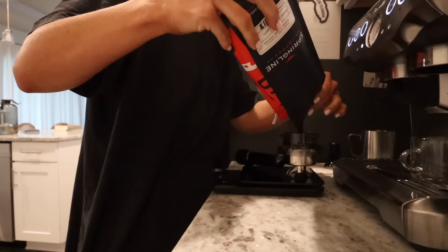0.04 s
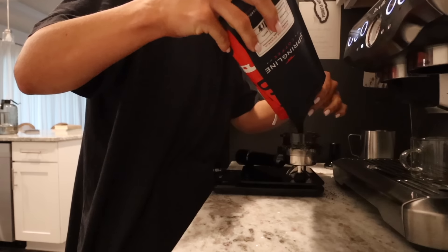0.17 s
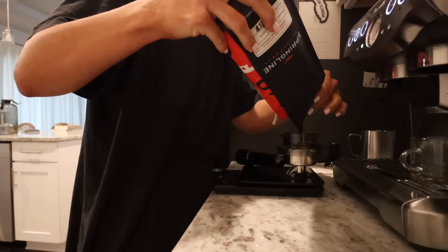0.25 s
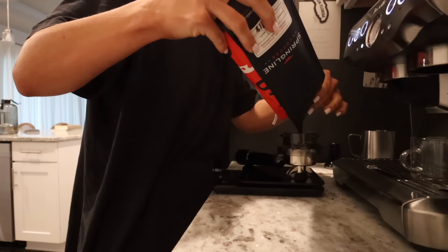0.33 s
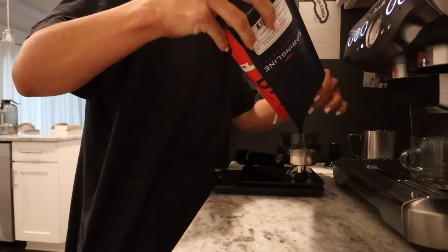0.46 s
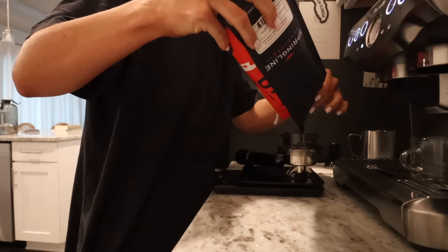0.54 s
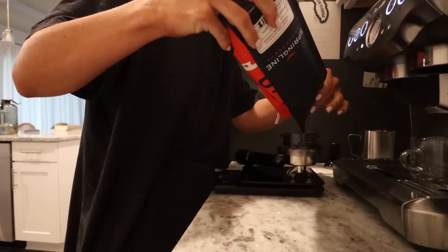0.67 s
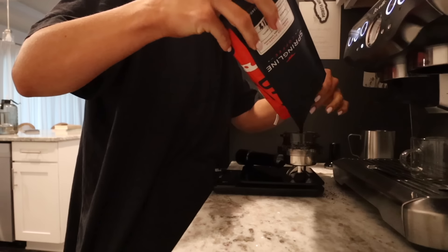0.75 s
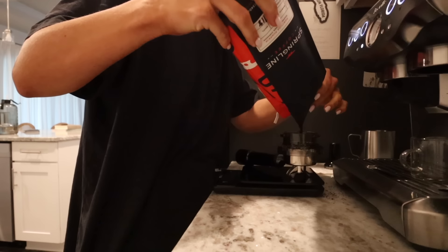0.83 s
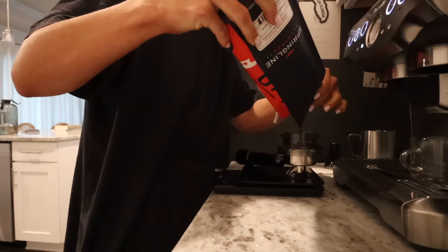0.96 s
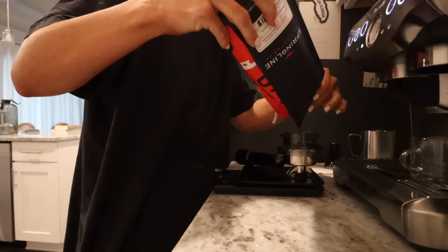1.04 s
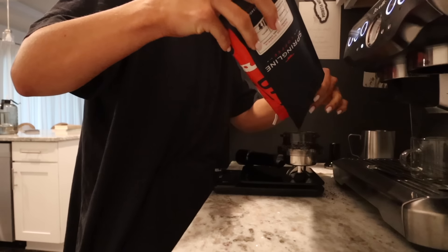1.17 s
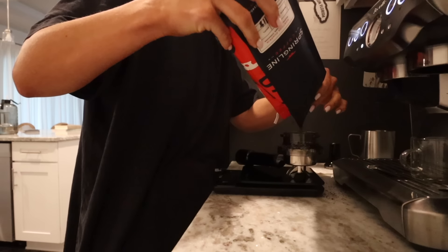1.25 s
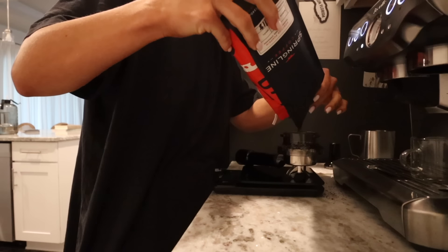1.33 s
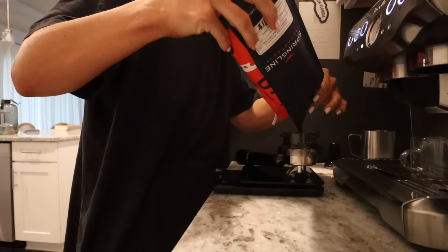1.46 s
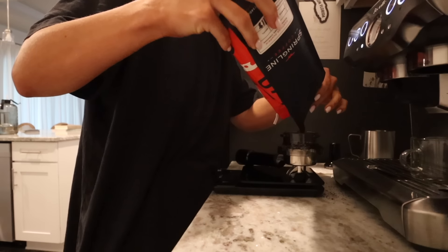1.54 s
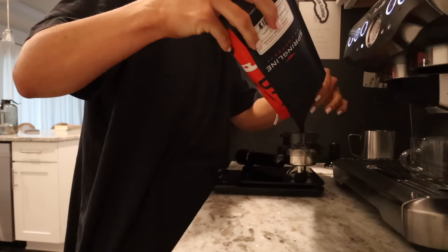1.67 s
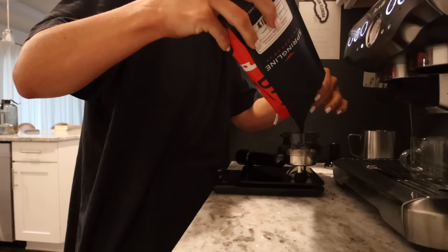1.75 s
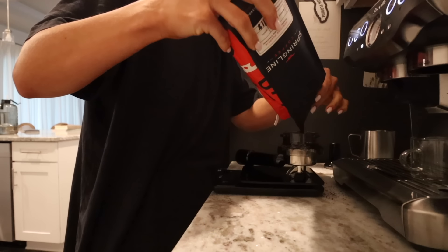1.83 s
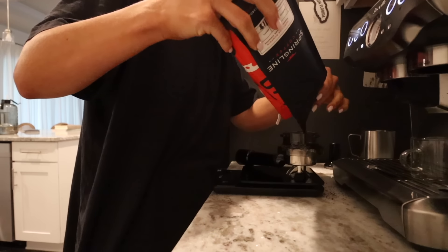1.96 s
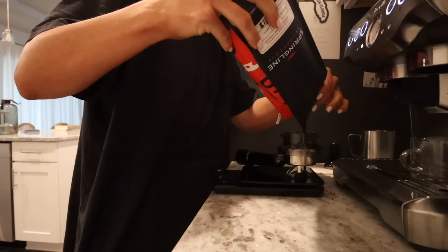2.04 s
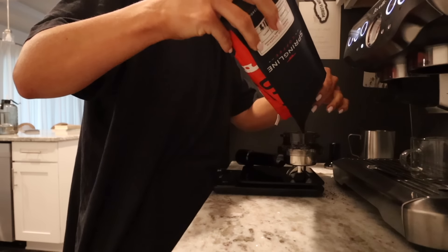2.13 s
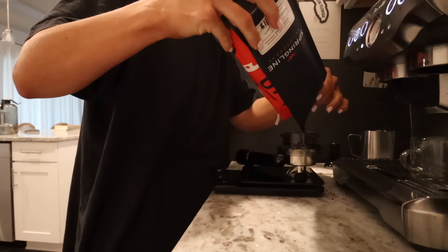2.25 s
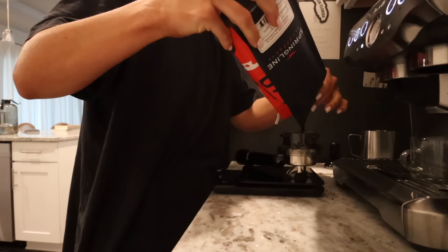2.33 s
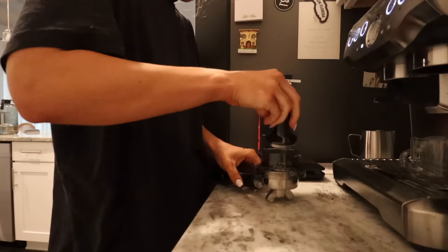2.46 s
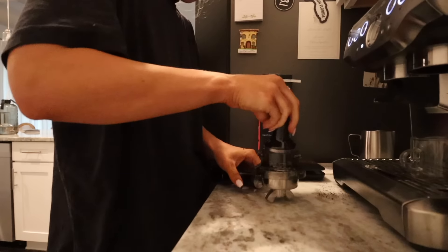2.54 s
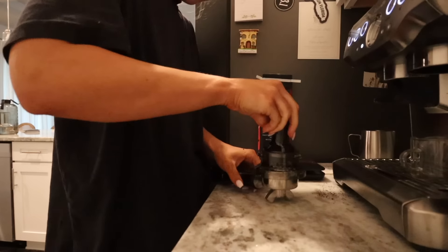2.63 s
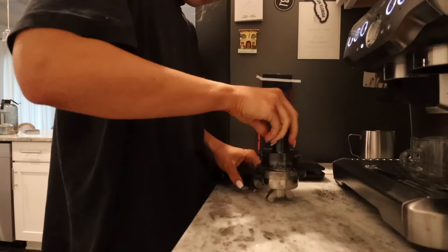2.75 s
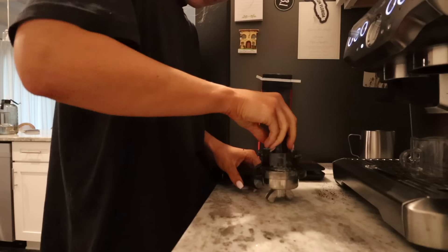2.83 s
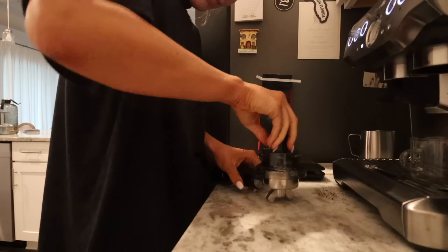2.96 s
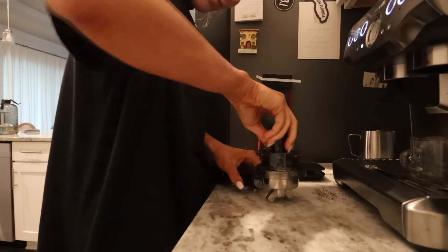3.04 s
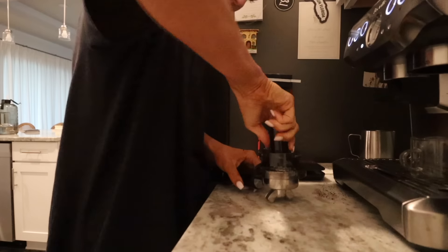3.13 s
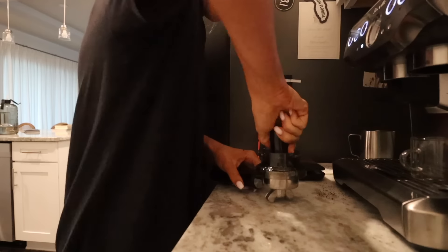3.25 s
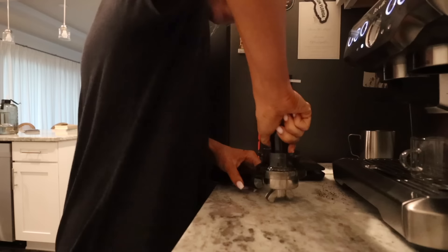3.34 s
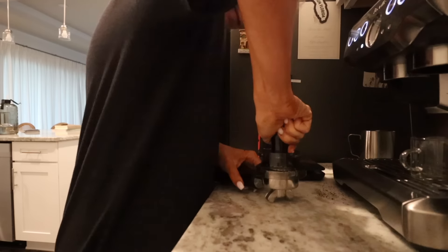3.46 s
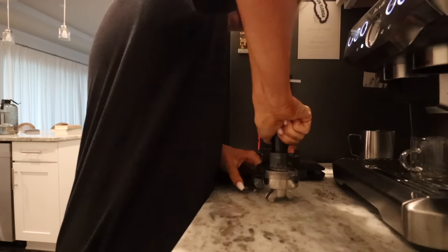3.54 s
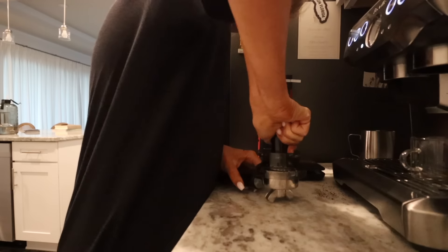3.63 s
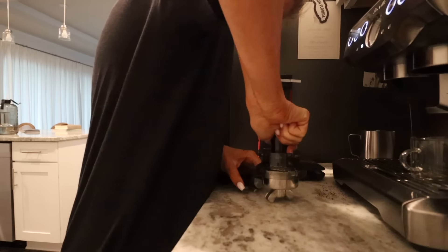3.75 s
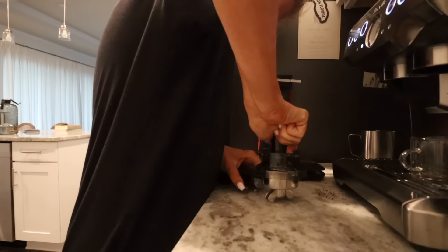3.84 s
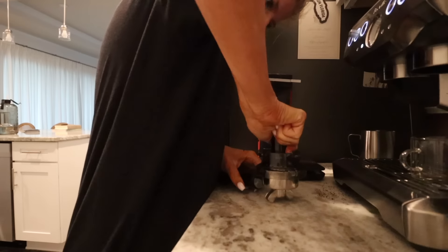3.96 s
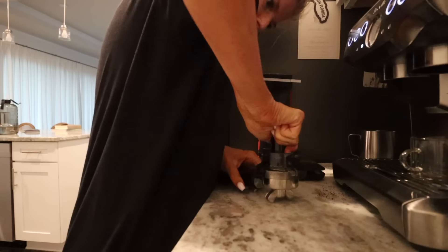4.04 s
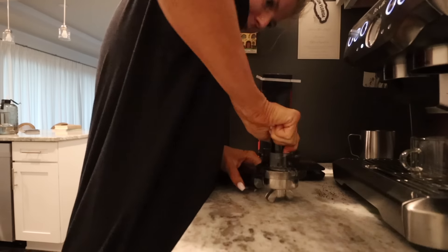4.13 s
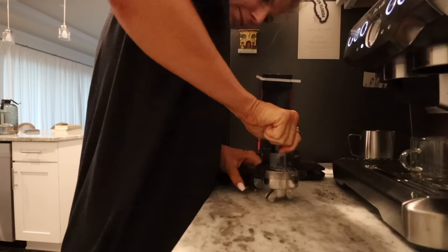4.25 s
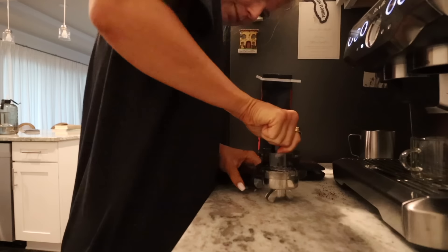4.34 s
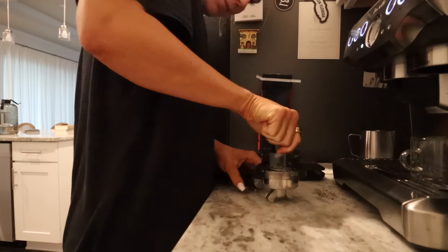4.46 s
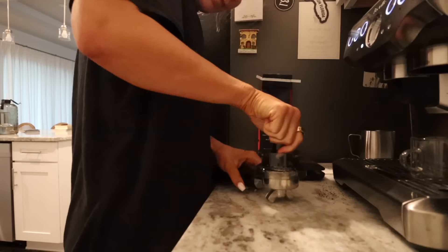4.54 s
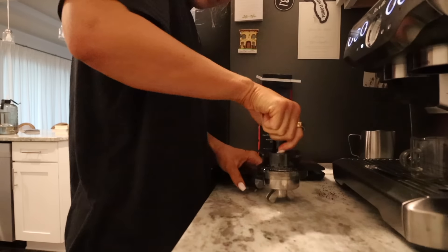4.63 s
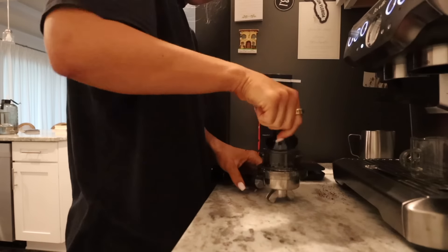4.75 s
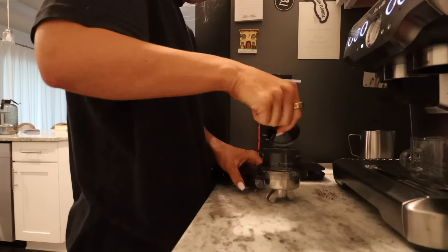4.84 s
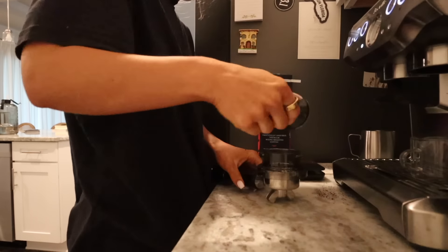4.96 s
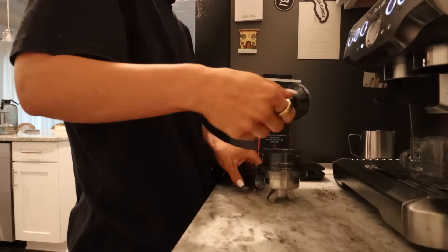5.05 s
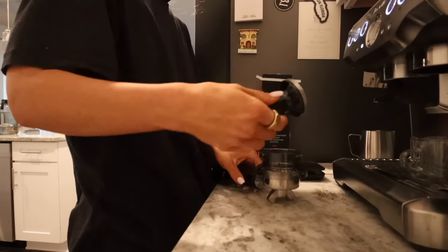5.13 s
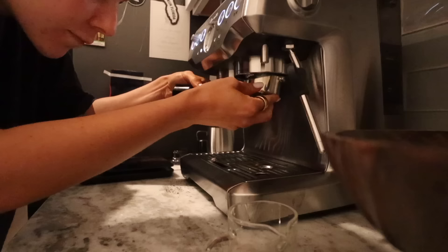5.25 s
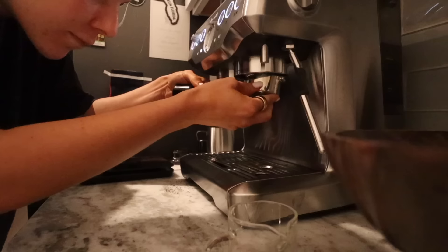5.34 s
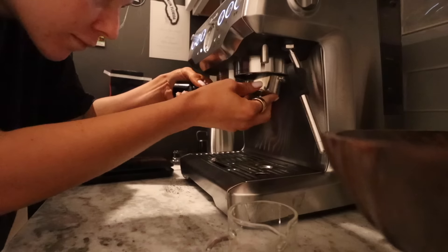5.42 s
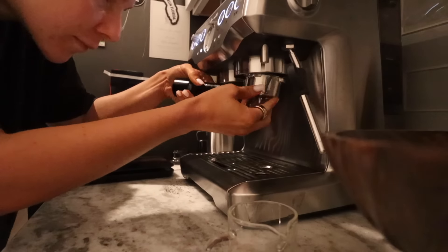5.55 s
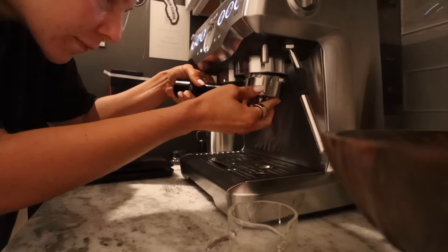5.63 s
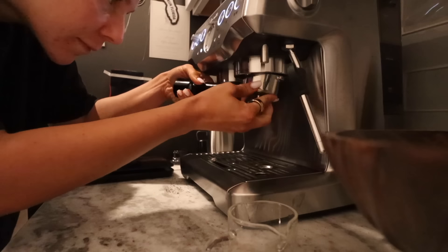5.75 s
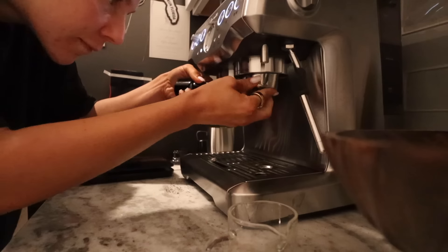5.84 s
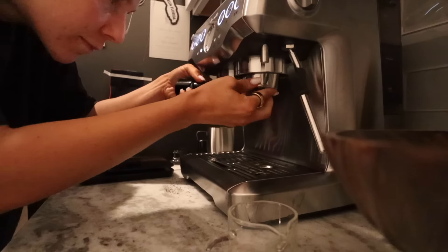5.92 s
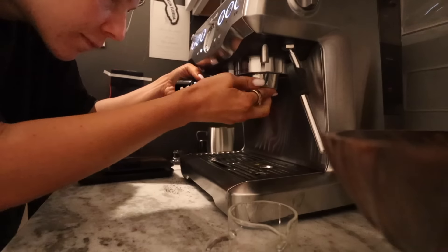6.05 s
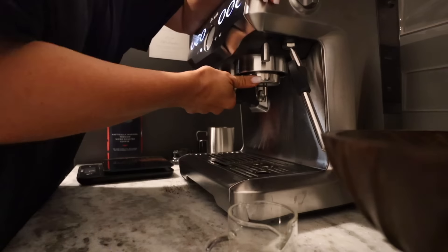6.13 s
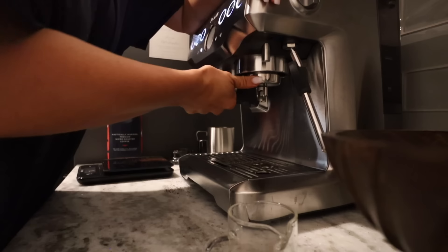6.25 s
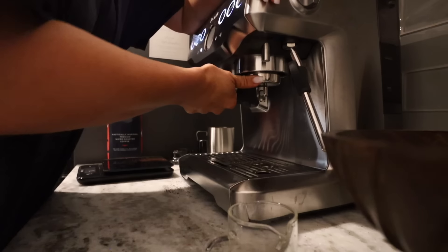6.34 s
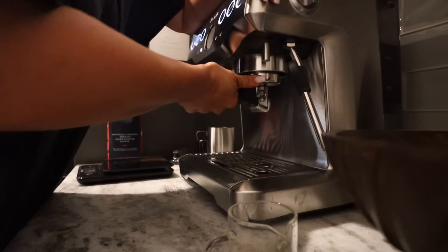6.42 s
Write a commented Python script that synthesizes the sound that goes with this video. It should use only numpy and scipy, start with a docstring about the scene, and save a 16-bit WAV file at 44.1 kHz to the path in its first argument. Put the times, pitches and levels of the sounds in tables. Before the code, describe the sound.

Faint, mostly low room air lies under everything in a small hard-surfaced kitchen, heard in near stereo. From 0 to 2.5 seconds dry coffee grounds hiss and patter into a metal basket, in quick shaken surges strongest around 1.2-1.7 and again near 2.2; from 1.15 the bag gives soft hollow booms and crinkles, with one sharper buckle at 1.5. At 2.6 the basket knocks loudly on stone with a dead thud, followed by smaller knocks and steel clinks until 3.15. Quiet gritty rubbing continues, with a quickening judder at 3.8-4.15, a tiny squeak at 3.98 and twisting scrapes to 4.7, when the tamper pops free hollowly. A faint brushing fades by 5.2. From 5.62 bright, heavy metal clanks hit the machine, densest and loudest around 5.85, with dry ticks and scraping. After a lull, a stuttering low groan swells at 6.45 and stops.

```python
"""Coffee grounds trickle and surge out of a bag over the quiet air of a small kitchen: coloured grains and hiss.
The bag flexes in short hollow booms. On the stone counter a tamper is set into the portafilter basket,
pressed down in slips and twisted: struck modes for the blows, resonant grit for the rubbing.
Then the portafilter clanks into the machine's group head and is wrenched tight with a stuttering groan.
Tamping has the least room sound, so it seems closest; a pair of microphones hears it all in stereo."""
import sys
import numpy as np
from scipy import signal
from scipy.fft import rfft, irfft, next_fast_len
from scipy.io import wavfile
from scipy.ndimage import uniform_filter1d

SR = 44100
rng = np.random.default_rng(int(sys.argv[2]) if len(sys.argv) > 2 else 0)


def int16_out(signal):
    """Quantize to a 16-bit WAV file."""
    q = np.round(np.clip(np.atleast_2d(signal).T, -1, 1) * 32767)
    wavfile.write(sys.argv[1], SR, q.astype(np.int16))


N = 286209
TIME = np.arange(N) / SR


def gain_of(db):
    """Decibels to amplitude."""
    return 10 ** (np.asarray(db) / 20)


def evened(x):
    """Scales to rms 1."""
    return x / np.sqrt(np.mean(x ** 2) + 1e-20)


def read(points, hz):
    """A spectrum joined by straight lines over log frequency."""
    f, value = np.transpose(points)
    return np.interp(np.log(hz + 1), np.log(f + 1), value)


def follow(rows):
    """Every column of a curve at each sample."""
    s, *columns = np.transpose(rows)
    return [np.interp(TIME, s, c) for c in columns]


def coloured(x, points):
    """Filters by a dB spectrum."""
    size = next_fast_len(x.shape[-1])
    gain = gain_of(read(points, np.fft.rfftfreq(size, 1 / SR)))
    return irfft(rfft(x, size) * gain, size)[..., :x.shape[-1]]


def dying(x, t60s):
    """Lets each frequency die at its own speed."""
    hz, t, z = signal.stft(x, SR, nperseg=128)
    decay = gain_of(-60 * t / read(t60s, hz)[:, None])
    return signal.istft(z * decay, SR)[1][:, :x.shape[-1]]


def resonated(x, hz, width):
    """Passes x through one resonance, its width in Hz."""
    return signal.lfilter(*signal.iirpeak(hz, hz / width, SR), x)


def band_passed(x, order, low_hz, high_hz):
    """Keeps one frequency band."""
    return signal.sosfilt(signal.butter(order, [low_hz, high_hz], "band", fs=SR, output="sos"), x)


def add(mix, s, sound):
    """Mixes a sound in at time s."""
    part = mix[:, max(round(s * SR), 0):][:, :sound.shape[-1]]
    part += sound[..., :part.shape[-1]]


def grains(per_s, spread_db, hiss):
    """Many tiny impacts of unequal size over a smooth hiss."""
    sizes = gain_of(spread_db * np.minimum(rng.exponential(1, (2, N)), 4))
    signed = sizes * rng.choice([-1, 1], (2, N))
    impacts = evened(signed * (rng.random((2, N)) < per_s / SR))
    return evened(impacts + hiss * rng.standard_normal((2, N)))


def clumped(x, depth_db, size):
    """Makes the level flutter at random, smoothed over size samples."""
    return x * gain_of(depth_db * evened(uniform_filter1d(rng.standard_normal(N), size)))


# the still kitchen: (frequency [Hz], relative level [dB])
AIR_SPECTRUM = [(12, -66), (20, -3.5), (88, -1.5), (110, -6.5), (163, -10), (210, -12), (310, -9.5),
                (459, -12.5), (642, -17.5), (1860, -24.5), (2080, -24.5), (3440, -29.5), (4940, -33.5),
                (8410, -44.5), (10500, -52.5), (12500, -70), (16000, -79)]
AIR_DB = -56


def kitchen_air():
    """Steady noise, mostly low, in the colour of the still kitchen."""
    return gain_of(AIR_DB) * evened(coloured(rng.standard_normal((2, N)), AIR_SPECTRUM))


# steady trickle of coffee out of the bag: (time [s], level [dB])
TRICKLE_LEVEL = [(0.0, -59.5), (0.3, -61.5), (0.7, -66.5), (1.03, -73), (1.3, -69), (1.74, -61), (2.0, -70),
                 (2.44, -67), (2.53, -86)]
# each shake of the bag lets a surge of grounds slide out: (time at its height [s], level [dB])
SHAKE_SURGES = [(0.02, -61.5), (0.14, -56), (0.42, -62), (0.55, -61), (0.81, -61), (0.96, -65), (1.11, -62),
                (1.243, -51.5), (1.387, -50), (1.52, -50.5), (1.665, -53.5), (1.795, -69), (1.925, -60),
                (2.065, -56), (2.208, -53), (2.345, -55.5)]
# the patter of the flowing grounds: (frequency [Hz], relative level [dB])
PATTER_SPECTRUM = [(300, -54), (900, 0.5), (1350, 5), (2200, -0.5), (2750, 5), (3300, 9.5), (4000, 6),
                   (4600, 2.5), (5400, 1.5), (6500, -1), (9500, -0.5), (11500, -17), (13000, -36),
                   (15000, -33)]
# single coarse crumbs: (frequency [Hz], relative level [dB])
CRUMB_SPECTRUM = [(600, -19), (2600, -2), (4000, -2), (6000, -7), (10000, -13), (12500, -42), (16000, -65)]
SURGE_RISE_S, SURGE_FALL_S = 0.023, 0.027
# the bare basket rings under the first grounds and is muffled as it fills
BARE_HZ, BARE_WIDTH_HZ, BARE_DB, MUFFLE_DB_PER_S = 4440, 900, -3, 21


def pour():
    """Grounds slide over the foil and patter into the basket in small clumps, in a trickle and surges."""
    trickle_db, = follow(TRICKLE_LEVEL)
    power = gain_of(trickle_db) ** 2 * (TIME < TRICKLE_LEVEL[-1][0])
    for s, db in SHAKE_SURGES:
        width = np.where(TIME < s, SURGE_RISE_S, SURGE_FALL_S)
        power = power + gain_of(db) ** 2 / (1 + ((TIME - s) / width) ** 2 / 2) ** 3
    flow = clumped(grains(per_s=2600, spread_db=0.0, hiss=0.57), depth_db=1.17, size=220)
    crumbs = coloured(grains(per_s=140, spread_db=2.2, hiss=0), CRUMB_SPECTRUM)
    patter = evened(coloured(flow, PATTER_SPECTRUM)) + gain_of(-12.0) * evened(crumbs)
    ring = resonated(patter, BARE_HZ, BARE_WIDTH_HZ)
    return np.sqrt(power) * (patter + gain_of(BARE_DB - MUFFLE_DB_PER_S * TIME) * ring)


def hollow(rows, glide, crackle_decay, crackle_hz, overtone, overtone_db, puff_db, size=5000):
    """A damped cavity booms in two modes, sliding in pitch as its shape changes; air puffs, its wall crackles."""
    t, out = np.arange(size) / SR, np.zeros((2, N))
    for s, db, hz, crackle_db, rise in rows:
        sliding_hz = hz * (1 + glide * np.tanh(t / (2 * rise) - 1))
        phase = 2 * np.pi * np.cumsum(sliding_hz) / SR
        puff = gain_of(puff_db) * evened(band_passed(rng.standard_normal(size), 2, hz / 4, hz))
        modes = np.sin(phase) + gain_of(overtone_db) * np.sin(overtone * phase)
        boom = t / rise * np.exp(1 - t / rise) * (modes + puff)
        wall = band_passed(rng.standard_normal((2, size)), 2, crackle_hz / 2, crackle_hz * 2)
        crackle = evened(wall) * np.exp(-t / crackle_decay)
        add(out, s, gain_of(db) * boom + gain_of(crackle_db) * crackle)
    return out


# fingers flex the bag: (time [s], level [dB], hollow pitch [Hz], crinkle level [dB], rise [s])
BAG_TAPS = [(1.162, -44.5, 184, -67, 0.006), (1.184, -48, 410, -59, 0.0039), (1.252, -51, 317, -60, 0.0072),
            (1.335, -50, 370, -58, 0.014), (1.478, -52, 322, -63, 0.0047), (1.497, -49, 374, -62, 0.0053),
            (1.614, -44, 369, -67, .007), (1.624, -53, 185, -74, .006), (1.648, -59, 355, -67, .006),
            (1.707, -44, 337, -73, 0.0037), (1.730, -48, 337, -74, 0.0036), (1.724, -54, 171, -66, 0.0055),
            (2.023, -52, 364, -63, 0.01), (2.176, -49, 390, -59, .006), (2.299, -49, 325, -62, .006),
            (2.435, -55, 334, -72, 0.0082)]
# the stiff wall of the bag buckles once: (time [s], level [dB], pitch [Hz], crinkle level [dB], rise [s])
BAG_BUCKLE = [(1.5105, -40.5, 1045, -49, 0.00082)]


def bag_flexing():
    """The bag booms softly and crinkles under the fingers; its wall buckles once at a higher pitch."""
    taps = hollow(BAG_TAPS, glide=-0.0091, crackle_decay=0.022, crackle_hz=1420,
                  overtone=1.16, overtone_db=-16, puff_db=-6.5)
    return taps + hollow(BAG_BUCKLE, glide=0.02, crackle_decay=0.004, crackle_hz=1700,
                         overtone=1.41, overtone_db=2, puff_db=-7)


def blows(rows, clack_db):
    """Tick, clack, knock and thump of each blow: hardness sets the treble, weight the bass."""
    return [(s, db + hard_db, db + hard_db / 2 + clack_db, db, db + weight_db)
            for s, db, hard_db, weight_db in rows]


# the tick, clack, knock and thump of a blow: (low edge [Hz], high edge [Hz])
BLOW_REGISTERS = [(2500, 10500), (700, 2500), (260, 700), (60, 220)]
# decay of the crowd of weaker modes: (frequency [Hz], t60 [s])
CROWD_DECAY = [(100, 0.12), (500, 0.089), (1500, 0.092), (4500, 0.058), (12000, 0.092)]
# longest ring of steel that is pinched tight, held in the hand, and of the free-standing machine [s]
PINCHED_T60, HELD_T60, FREE_T60 = .035, .13, .2


def struck(blow_list, modes, crowd, longest, crowd_db, detune, build_up, crack, crack_decay, size=14000):
    """Each blow rings the modes and a crowd of weaker ones, its energy shared among four registers."""
    t, out = np.arange(size) / SR, np.zeros((2, N))
    hz, db, t60 = np.transpose(modes)[:, :, None]
    # modes build up over a set number of cycles, so the bass arrives after the treble
    swing = (1 - np.exp(-t * hz / build_up)) * gain_of(db - 60 * t / np.minimum(t60, longest))
    contact = 1 + crack * np.exp(-t / crack_decay)
    for s, *levels_db in blow_list:
        # the grip and the point of contact change a little from blow to blow
        pitch = hz * (1 + detune * rng.standard_normal(hz.shape))
        sign = rng.choice([-1, 1], (2, len(hz)))  # each mode radiates differently in each direction
        ring = sign @ (swing * np.sin(2 * np.pi * pitch * t))
        rest = contact * dying(coloured(rng.standard_normal((2, size)), crowd), CROWD_DECAY)
        body = evened(ring) + gain_of(crowd_db) * evened(rest)
        for (low, high), level_db in zip(BLOW_REGISTERS, levels_db):
            part = band_passed(body, 4, low, high)
            onset = part[:, :SR // 50].std(1, keepdims=True)  # levels refer to the first 20 ms
            filter_lag = .42 / (high - low)
            add(out, s - filter_lag, gain_of(level_db) * part / onset)
    return out


# portafilter on the stone counter as the tamper is set on it:
# (time [s], strength [dB], hardness [dB], weight [dB])
COUNTER_KNOCKS = [(2.6183, -29.5, -8, -3), (2.6215, -24, -27, -2.5), (2.631, -36.5, -9, -6),
                  (2.654, -31, -16, -6), (2.658, -35.5, -15, -12), (2.677, -51, 2, -1),
                  (2.706, -56.5, 6, 15), (2.737, -30.5, -18, -23), (2.744, -32.5, -12, -9),
                  (2.760, -42.5, -10, 0), (2.883, -33, -17, 0), (2.896, -43, -26, 11),
                  (3.0345, -32.5, -15, -15), (3.046, -56, -19, -4)]
# ringing of the portafilter on stone: (frequency [Hz], relative level [dB], t60 before the cap [s])
BASKET_MODES = [(94.3, 4.5, 0.095), (140, -3, 0.056), (193, -6, 0.15), (287, -0.5, 0.083),
                (383, 5.5, 0.048), (487, 6, 0.051), (553, 3, 0.046), (631, -1, 0.11), (754, 3, 0.082),
                (860, -4.5, 0.076), (1112, 0, 0.037), (1210, 1.5, 0.042), (1454, -17, 0.06),
                (1600, -9, 0.083), (1850, -11, 0.04), (2030, -8, 0.036), (2920, -5, 0.043),
                (3540, -19, 0.052), (4080, -15, 0.09), (5160, -14, 0.03), (6340, -8, 0.02),
                (9150, -26, 0.038)]
# the crowd of weaker modes around those: (frequency [Hz], relative level [dB])
BASKET_CROWD_SPECTRUM = [(60, 9), (170, -14), (280, 15.5), (500, 4.5), (720, 9.5), (1100, 5.5), (2300, -10),
                         (3200, -5.5), (5500, -8), (10500, -20), (15000, -43)]


def counter_knocks():
    """The hand-held portafilter knocks on stone and rings briefly."""
    return gain_of(-7.5) * struck(
        blows(COUNTER_KNOCKS, clack_db=5.5), BASKET_MODES, BASKET_CROWD_SPECTRUM, HELD_T60,
        crowd_db=-5, detune=0.004, build_up=0.29, crack=0.91, crack_decay=0.0016)


# some of the knocks also drive a dead thud out of the counter: # (time [s], level [dB], pitch [Hz], crunch
# level [dB], rise [s])
COUNTER_THUDS = [(2.6212, -18.5, 362, -36, 0.0028), (2.6565, -27, 390, -41, 0.0016),
                 (2.886, -43, 170, -50, 0.0027), (3.0362, -31, 450, -48, 0.0022)]


def counter_thuds():
    """The counter answers with short damped booms that sink in pitch."""
    return hollow(COUNTER_THUDS, glide=-0.095, crackle_decay=0.0063, crackle_hz=900,
                  overtone=1.44, overtone_db=-8.5, puff_db=-7.5)


def stroke(length, swell_db, attack, release):
    """One movement of the hand: it sets in, swells or fades steadily, and dies away."""
    t = np.arange(0, length + 8 * release, 1 / SR)
    swell = gain_of(swell_db * (np.minimum(t / length, 1) - .5))
    return np.minimum(t / attack, 1) * swell * np.exp(-np.maximum(t - length, 0) / release)


# steel rubbing on gritty steel: (frequency [Hz], relative level [dB])
RUB_SPECTRUM = [(200, 23), (600, 17), (1000, 9.5), (1600, 11), (2200, 5.5), (4000, 2.5), (5500, 4),
                (7000, 0.5), (9500, -0.5), (12000, -17), (14000, -38), (16000, -45)]


def rubbed(strokes, resonances, grit, judder_db, attack, release, judder_size=300):
    """Grit between steel faces, its level fluttering, excites the resonances of the part that is rubbed."""
    dull = coloured(clumped(grit, judder_db, judder_size), RUB_SPECTRUM)
    ring, out = np.zeros((2, N)), np.zeros((2, N))
    for hz, width, db in resonances:
        ring += gain_of(db) * resonated(dull, hz, max(width, 150))
    for s, length, db, swell_db, ring_db in strokes:
        first = round(s * SR)
        effort = stroke(length, swell_db, attack, release)[:N - first]
        span = slice(first, first + len(effort))
        rub = evened(dull[:, span] + gain_of(ring_db) * ring[:, span])
        add(out, s, gain_of(db) * effort * rub)
    return out


# the tamper's edge scrapes into the basket:
# (time [s], length [s], level [dB], swell [dB], ring of the steel [dB])
SEATING_STROKES = [(2.63, 0.21, -62, -16, 1), (2.85, 0.021, -54, 0, 1), (3.046, 0.059, -50.5, 7.5, 4.5),
                   (3.135, 0.0094, -58, -16, -5)]
# the basket rim: (frequency [Hz], width, at least 150 in use [Hz], relative level [dB])
RIM_RING = [(1360, 310, -9), (3080, 330, 2.5), (3860, 170, 6.5), (4550, 110, -6), (5400, 150, -9)]
# squeal of steel on steel: (frequency [Hz], width [Hz], relative level [dB])
STEEL_SQUEAL = [(4320, 630, 6.5), (4650, 400, -11), (5660, 680, -12)]


def tamper_seating():
    """Scrapes ring both the basket rim and the steel."""
    grit = grains(per_s=2000, spread_db=-6.0, hiss=0.94)
    return rubbed(SEATING_STROKES, RIM_RING + STEEL_SQUEAL, grit,
                  judder_db=1.5, attack=0.0083, release=0.041)


# light contacts of the tamper on the steel rim: (time [s], strength [dB], hardness [dB], weight [dB])
RIM_CLINKS = [(2.874, -41.5, 0.5, -13), (2.9725, -33, -3, -5.5), (2.989, -47, -6, 11),
              (3.1335, -47, 6.5, -7), (3.138, -47, 5, 1)]
# tamper and basket ring against each other:
# (frequency [Hz], relative level [dB], t60 before the cap [s])
CLINK_MODES = [(205, -1, 0.16), (364, 5, 0.042), (738, 8.5, 0.14), (1180, -10, 0.068), (1577, 5.5, 0.064),
               (2590, -3, 0.051), (2940, 8, 0.014), (3380, 10, 0.01), (4030, 8.5, 0.014), (5500, -7, 0.021),
               (6400, -4, 0.027), (8750, -19, .03)]


def rim_clinks():
    """Light steel contacts, damped by the hand."""
    return gain_of(-7.0) * struck(
        blows(RIM_CLINKS, clack_db=-2.5), CLINK_MODES, BASKET_CROWD_SPECTRUM, HELD_T60,
        crowd_db=-1.5, detune=0.0044, build_up=0.078, crack=0.4, crack_decay=0.002)


# the tamper slides down the basket wall and is drawn up again:
# (time [s], length [s], level [dB], swell [dB], ring of the wall [dB])
WALL_STROKES = [(3.06, 0.076, -56, 17, -3), (3.36, 0.97, -66, 0, -4.5), (4.42, 0.14, -61, 6, 1)]
# the basket wall: (frequency [Hz], width [Hz], relative level [dB])
WALL_RING = [(1340, 180, -27), (1790, 200, 10), (2200, 460, 11.5), (2650, 230, 5)]


def wall_slides():
    """Slow-starting rubs ring the wall of the basket."""
    grit = grains(per_s=2300, spread_db=5.0, hiss=0.85)
    return rubbed(WALL_STROKES, WALL_RING, grit, judder_db=5.0, attack=0.057, release=0.033)


# the tamper is leant on, twisted, eased loose and brushed clear:
# (time [s], length [s], level [dB], swell [dB], ring of the basket rim [dB])
TWIST_STROKES = [(3.25, 0.078, -56.5, 7, 1), (3.36, 0.49, -65.5, 2, -19), (3.96, 0.38, -55.5, 12, 8.5),
                 (4.41, 0.29, -55, 4, -36), (4.76, 0.39, -67, -2, -15.5)]


def tamper_twist():
    """Gritty rubs ring the rim of the basket."""
    grit = grains(per_s=900, spread_db=0.0, hiss=1.0)
    return rubbed(TWIST_STROKES, RIM_RING, grit, judder_db=1.76, attack=0.011, release=0.044)


# push of the arm, as the strength of a slip: (time [s], level [dB])
ARM_PUSH = [(3.80, -49), (3.90, -53), (3.96, -49), (4.09, -46), (4.16, -62)]
# under full pressure the tamper judders down the basket, each slip a little sooner than the last
JUDDER_START_S, FIRST_GAP_S, GAP_SHRINK_S = 3.806, 0.0355, 0.00115
SLIP_HARDNESS_DB, SLIP_WEIGHT_DB = -6, 12


def judder(count):
    """The quickening train of slips, each as strong as the push behind it."""
    gaps = FIRST_GAP_S - GAP_SHRINK_S * np.arange(count - 1)
    times = JUDDER_START_S + np.append(0, np.cumsum(gaps))
    return [(s, np.interp(s, *np.transpose(ARM_PUSH)), SLIP_HARDNESS_DB, SLIP_WEIGHT_DB) for s in times]


# packed coffee gives way in single snaps: (time [s], strength [dB], hardness [dB], weight [dB])
COFFEE_SNAPS = [(3.271, -71.5, 16.5, -7), (3.570, -52.5, 7.5, 8.5), (3.655, -54.5, -4, 13.5),
                (3.749, -54, -2.5, 12.5), (3.942, -44.5, -7.5, 0), (3.9835, -57, 4, -10),
                (4.317, -62, 11, 6), (4.4075, -47, -1.5, -12), (4.440, -65.5, -10, 23.5),
                (4.482, -46, -21, -2)]
# damped basket under the leaning arm: (frequency [Hz], relative level [dB], t60 before the cap [s])
PRESSED_MODES = [(92.6, 6, 0.037), (115, -2.5, 0.029), (174, -11, 0.058), (277, -2.5, 0.061),
                 (571, -6, 0.079), (1360, 4.5, 0.042), (2050, -19, 0.016), (3000, -10, 0.0091),
                 (3900, -7, 0.036), (5100, -25, 0.015)]


def tamper_press():
    """Snaps of the packed coffee and the judder of the tamper ring the damped basket."""
    return gain_of(-6.5) * struck(
        blows(COFFEE_SNAPS + judder(count=13), clack_db=-3.5), PRESSED_MODES, BASKET_CROWD_SPECTRUM,
        HELD_T60, crowd_db=0.0, detune=0.072, build_up=0.2, crack=0.55, crack_decay=0.0018)


# during the push the tamper's rim squeaks once on the basket:
# (time [s], length [s], level [dB], swell [dB], ring of the rim [dB])
SQUEAK_STROKE = [(3.9825, 0.0062, -39.5, -11, 14.5)]
# the squeaking rim: (frequency [Hz], width [Hz], relative level [dB])
SQUEAK_RESONANCE = [(4830, 450, 2.5)]


def rim_squeak():
    """One very short rub rings a single resonance."""
    grit = grains(per_s=3000, spread_db=9.0, hiss=1.0)
    return rubbed(SQUEAK_STROKE, SQUEAK_RESONANCE, grit, judder_db=4.5, attack=0.0007, release=0.0015)


# the tamper pops free of the basket:
# (time [s], level [dB], pitch of the cavity [Hz], rasp level [dB], rise [s])
TAMPER_POPS = [(4.6605, -34, 500, -53, 0.0043), (4.718, -46, 400, -63, 0.0035),
               (4.7288, -35.5, 451, -48, 0.0024), (4.738, -43.5, 134, -61, 0.0049)]


def tamper_pops():
    """The cavity under the tamper opens with short booms that rise in pitch."""
    return hollow(TAMPER_POPS, glide=0.28, crackle_decay=0.01, crackle_hz=850,
                  overtone=1.85, overtone_db=-11, puff_db=-20)


# the portafilter against the machine: (time [s], strength [dB], hardness [dB], weight [dB])
MACHINE_CLANKS = [(5.332, -56, -10, 12), (5.6212, -25, 8.5, -4), (5.6223, -20, -1, -8),
                  (5.6302, -28, 2.5, 7), (5.634, -22.5, -45, 3), (5.673, -45, -27, 8),
                  (5.747, -29.5, -10.5, 1.5), (5.760, -29.5, -49, -3), (5.779, -54, -18, -3),
                  (5.8235, -32, 7.5, 10.5), (5.829, -18.5, -30, -5), (5.839, -25, -38, -18),
                  (5.849, -11.5, -51, -8), (5.870, -19.5, -52, -1), (5.882, -25, -48, 1),
                  (5.910, -53, 7.5, 8), (5.934, -53, -24, -16), (5.955, -47, -42, -5),
                  (5.980, -43, -49, -18), (6.056, -32, -70, -11), (6.075, -54, -6, 17.5),
                  (6.371, -48.5, 6, 0)]
# ringing of machine and portafilter: (frequency [Hz], relative level [dB], t60 before the cap [s])
MACHINE_MODES = [(76, -7, 0.23), (101, 0.5, 0.062), (120, -7, 0.042), (168, -2, 0.053), (191, 6, 0.12),
                 (258, -1, 0.082), (331.7, 5, 0.14), (362.5, 5.5, 0.14), (413, 2, 0.095), (458, 3, 0.084),
                 (500, -1, 0.11), (574, 0.5, 0.082), (613, 0.5, 0.037), (953, 4.5, 0.03), (1234, 1, 0.093),
                 (1275, 2.5, 0.086), (1340, 5, 0.071), (1420, 0, 0.087), (1610, 7, 0.045), (1737, 4, 0.048),
                 (1918, 1, 0.1), (1985, 0, 0.091), (2260, 6.5, 0.058), (2530, 10.5, 0.06),
                 (2700, 7.5, 0.048), (2900, -2, 0.035), (3410, -9, 0.04), (3810, 3.5, 0.033),
                 (4120, -3, 0.042), (4590, -1.5, 0.04), (5600, -11, 0.04), (5960, -3, 0.049),
                 (6420, -14, 0.03), (7700, -22, 0.027), (8840, -17, .035)]
# the crowd of weaker modes around those: (frequency [Hz], relative level [dB])
MACHINE_CROWD_SPECTRUM = [(50, -9), (110, -6), (180, 12.5), (250, 9), (400, 14.5), (560, -13), (720, -4),
                          (1300, -2.5), (2500, 3), (4400, -4.5), (5100, -8.5), (6300, -13), (10500, -18),
                          (15000, -30)]


def machine_clanks():
    """The free-standing machine rings when the portafilter hits it."""
    return gain_of(-6.0) * struck(
        blows(MACHINE_CLANKS, clack_db=3), MACHINE_MODES, MACHINE_CROWD_SPECTRUM, FREE_T60,
        crowd_db=-2.5, detune=0.0082, build_up=0.44, crack=1.05, crack_decay=0.003)


# the lugs rubbing in the group head:
# (time [s], length [s], level [dB], swell [dB], ring of the lugs [dB])
LUG_STROKES = [(5.545, 0.07, -49.5, -2.5, -24), (5.65, 0.13, -56, -5, 8), (5.78, 0.15, -51, 12, -18),
               (5.828, 0.049, -40, -13, -6), (6.15, 0.256, -62.5, 1.5, -3), (6.385, 0.11, -52, -10, 9)]


def lug_rubs():
    """Steel lugs squeal on the steel of the group head."""
    grit = grains(per_s=1900, spread_db=1.5, hiss=1.0)
    return rubbed(LUG_STROKES, STEEL_SQUEAL, grit, judder_db=3.0, attack=0.012, release=0.0066)


# lugs catch and skip on their ramp in dry ticks: (time [s], strength [dB], hardness [dB], weight [dB])
LUG_TICKS = [(5.6855, -41, -7, -8), (5.7035, -33.5, -8, -5), (5.712, -52, 1, -7), (5.785, -53, -6, -10),
             (5.795, -47, 3, -10), (5.837, -32, 7.5, -5), (5.8445, -36, -5, 2), (5.858, -40.5, 13.5, -10),
             (5.8675, -25, -9, -6), (5.874, -40.5, 7, -8)]


def lug_rattle():
    """Light blows on the machine, whose ring is pinched short."""
    return gain_of(-11.0) * struck(
        blows(LUG_TICKS, clack_db=-0.5), MACHINE_MODES, MACHINE_CROWD_SPECTRUM, PINCHED_T60,
        crowd_db=-9, detune=0.026, build_up=0.32, crack=2.1, crack_decay=0.0015)


# the seal sticks and slips as the handle is pulled tight: (time [s], level [dB])
GROAN_LEVEL = [(6.17, -62), (6.225, -50), (6.28, -63), (6.315, -57.5), (6.37, -56), (6.415, -41.5),
               (6.448, -35.5), (6.47, -39), (6.491, -57)]
# the gripped handle and group head: (frequency [Hz], relative level [dB], t60 [s])
HANDLE_MODES = [(178, -2, 0.03), (286, 5, 0.049), (350, 2, 0.042), (447, -1, 0.037), (530, -27, .03)]


def groan(slips_hz, jitter, spread_db, low_hz, high_hz, size=4000):
    """Uneven slips of the rubber seal thump the handle, nearly fast enough to make a pitch."""
    level_db, = follow(GROAN_LEVEL)
    rate = slips_hz * np.exp(jitter * evened(uniform_filter1d(rng.standard_normal(N), 300)))
    ticks = np.diff(np.floor(np.cumsum(rate) / SR), prepend=0)
    slips = ticks * gain_of(spread_db * rng.standard_normal((2, N)))
    t = np.arange(size) / SR
    ring = sum(gain_of(db - 60 * t / t60) * np.sin(2 * np.pi * hz * t) for hz, db, t60 in HANDLE_MODES)
    thumps = signal.oaconvolve(slips, ring[None], axes=1)[:, :N]
    thumps = band_passed(thumps, 3, low_hz, high_hz)
    return evened(thumps) * gain_of(level_db) * (TIME > GROAN_LEVEL[0][0])


# decay of the room: (frequency [Hz], t60 [s])
ROOM_DECAY = [(80, 0.18), (350, 0.53), (1500, 0.55), (4500, 0.53), (10000, 0.031)]
# colour of the room: (frequency [Hz], relative level [dB])
ROOM_SPECTRUM = [(80, 7.5), (350, -2), (750, 5.5), (1400, -2), (4400, -10), (6000, -3.5), (12000, 0.5)]


def kitchen(x, wet_db, gap=0.0006, size=26000):
    """Adds the diffuse answer of the hard walls and counters, sparse random echoes after a gap in s."""
    echoes = rng.standard_normal((2, size)) * (rng.random((2, size)) < .12)
    echoes = echoes * (np.arange(size) / SR > gap)
    tail = dying(coloured(echoes, ROOM_SPECTRUM), ROOM_DECAY)
    tail = tail / np.linalg.norm(tail[0])
    return x + gain_of(wet_db) * signal.fftconvolve(x, tail, axes=1)[:, :N]


# stereo width before each source's own offset: (frequency [Hz], side minus mid [dB])
SIDE_LEVEL = [(60, -35.5), (125, -17.5), (250, -14), (500, -8), (1200, -4.5), (2500, -4.5), (4500, -2),
              (9000, 2.5), (15000, 18)]
# share of the side signal from the front wave, before scaling: (frequency [Hz], share [0-1])
FRONT_SHARE = [(100, 0.34), (500, 0.47), (1000, 0.26), (1800, 0.52), (3500, 0.32), (5000, 0.38),
               (9000, 0.08)]


def stereo(field, width_db, lag_angle, direct):
    """Two microphones hear the front wave plus or minus a side signal, part turned in phase, part unrelated."""
    front, sideways = field
    size = next_fast_len(N)
    share = np.clip(direct * read(FRONT_SHARE, np.fft.rfftfreq(size, 1 / SR)), 0, 1)
    turned = share * np.exp(-1j * lag_angle) * rfft(front, size)  # lag_angle in radians
    unrelated = np.sqrt(1 - share ** 2) * rfft(sideways, size)
    side = gain_of(width_db) * coloured(irfft(turned + unrelated, size)[:N], SIDE_LEVEL)
    return np.array([front + side, front - side])


def scene():
    """Pouring, tamping and locking in, over the quiet air of the kitchen."""
    air = kitchen_air()
    pouring = pour() + bag_flexing()
    tamping = counter_knocks() + counter_thuds() + tamper_seating() + rim_clinks() + wall_slides()
    tamping += tamper_twist() + tamper_press() + rim_squeak() + tamper_pops()
    locking = machine_clanks() + lug_rubs() + lug_rattle()
    locking += groan(slips_hz=169, jitter=0.23, spread_db=3.0, low_hz=89, high_hz=520)
    return (stereo(air, width_db=11.0, lag_angle=1.05, direct=0.2)
            + stereo(kitchen(pouring, wet_db=-12.5), width_db=4.5, lag_angle=3.7, direct=1.0)
            + stereo(kitchen(tamping, wet_db=-19.5), width_db=2.0, lag_angle=3.3, direct=1.1)
            + stereo(kitchen(locking, wet_db=-16.5), width_db=2.0, lag_angle=2.35, direct=0.95))


EDGE_HZ = 16300


def record(dry):
    """The band limit of the recorder: a steep low-pass."""
    low_pass = signal.firwin(511, EDGE_HZ, window=("kaiser", 9), fs=SR)
    return signal.oaconvolve(dry, low_pass[None], "same")


dry = scene()
out = record(dry)
int16_out(out)
```